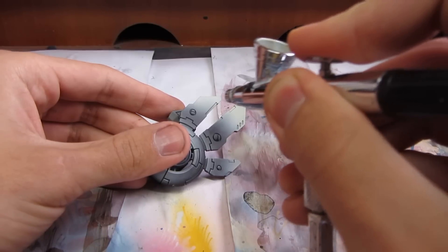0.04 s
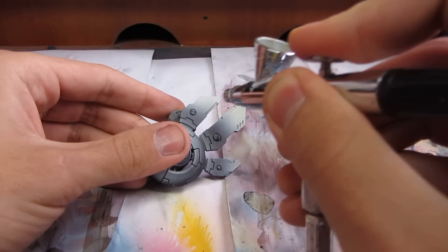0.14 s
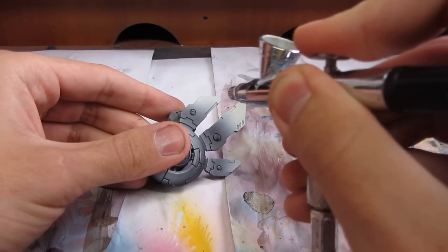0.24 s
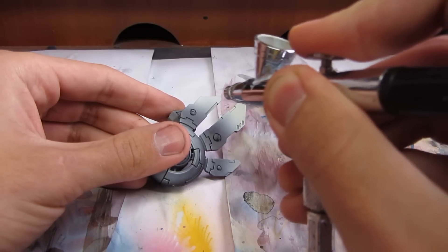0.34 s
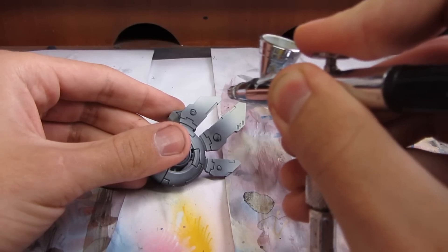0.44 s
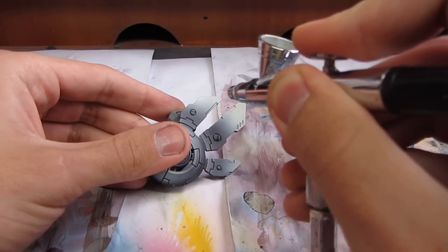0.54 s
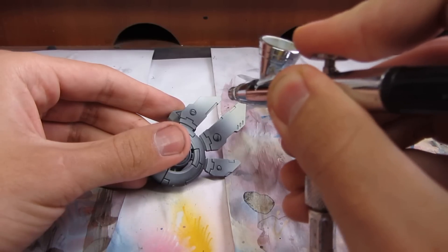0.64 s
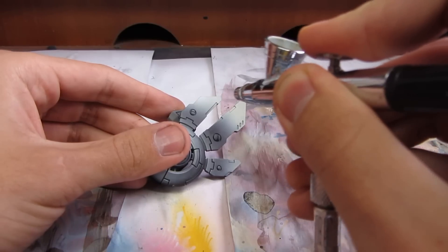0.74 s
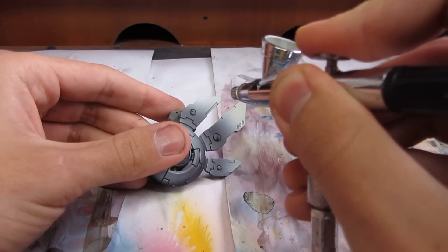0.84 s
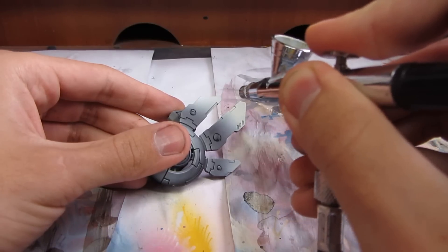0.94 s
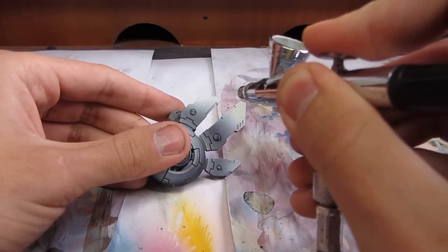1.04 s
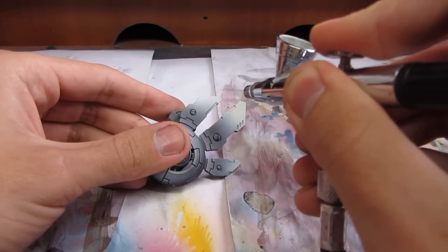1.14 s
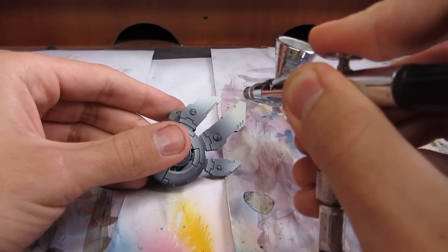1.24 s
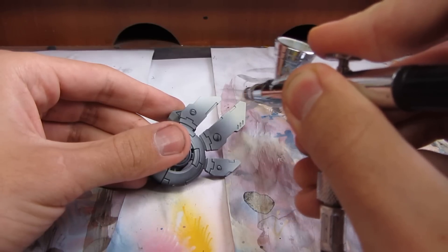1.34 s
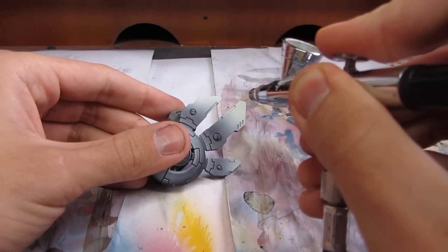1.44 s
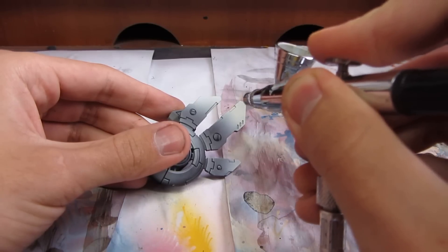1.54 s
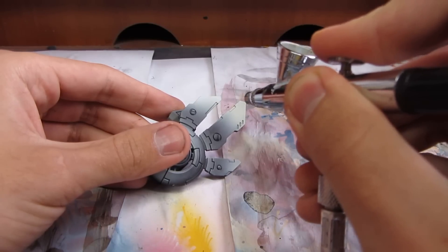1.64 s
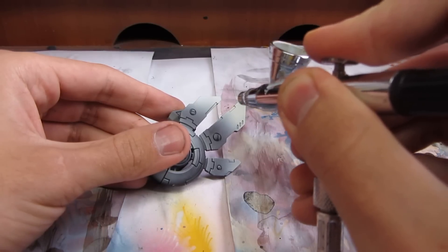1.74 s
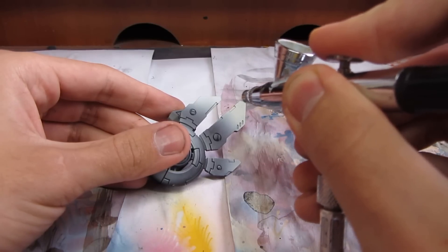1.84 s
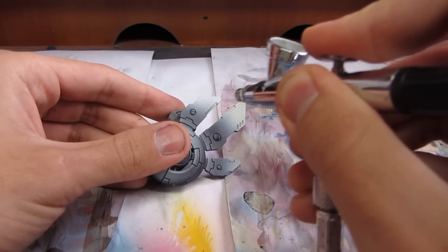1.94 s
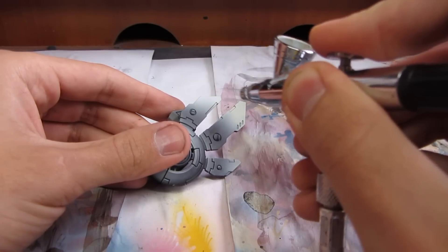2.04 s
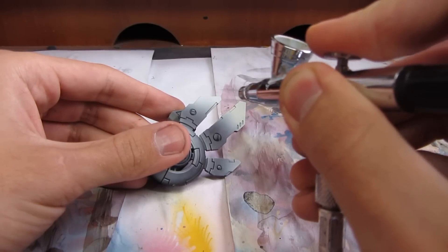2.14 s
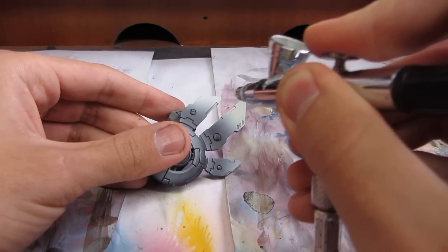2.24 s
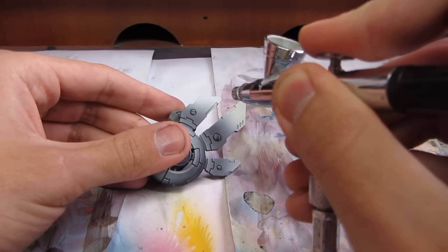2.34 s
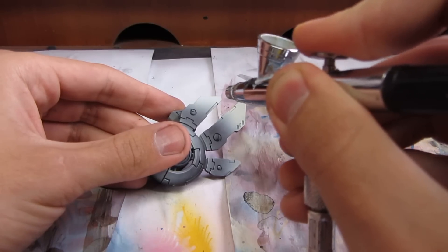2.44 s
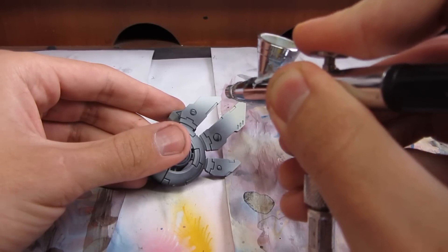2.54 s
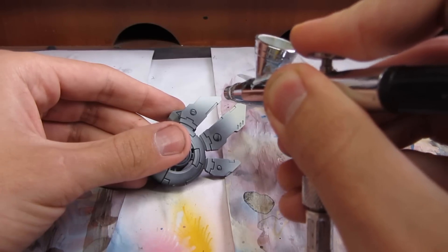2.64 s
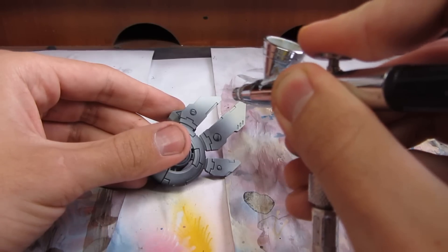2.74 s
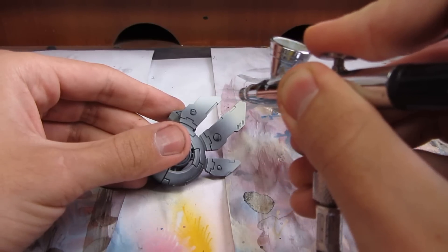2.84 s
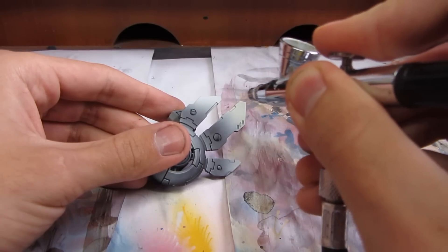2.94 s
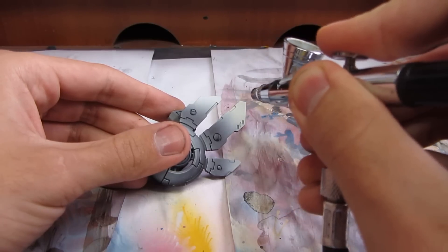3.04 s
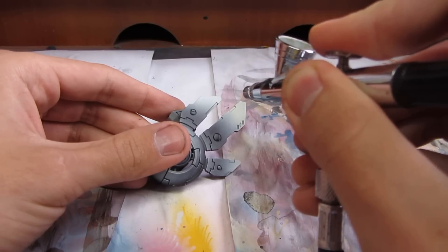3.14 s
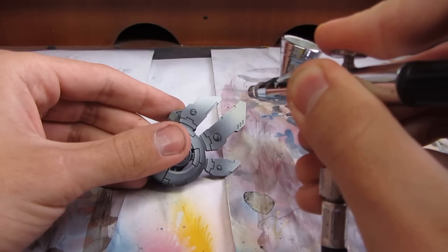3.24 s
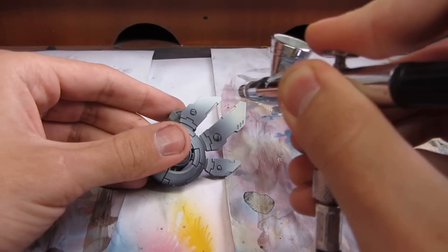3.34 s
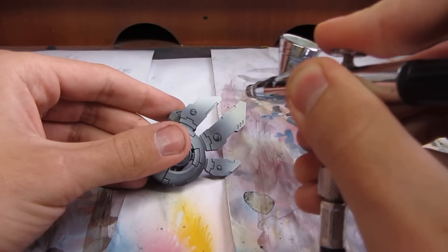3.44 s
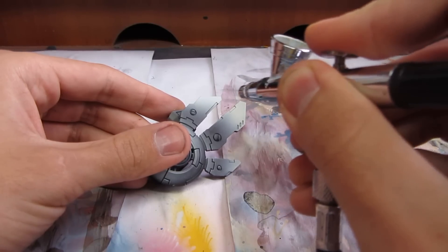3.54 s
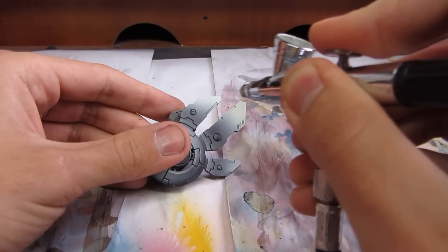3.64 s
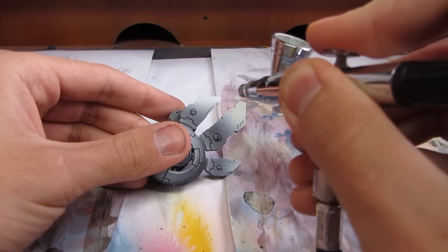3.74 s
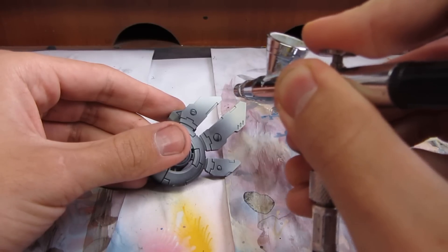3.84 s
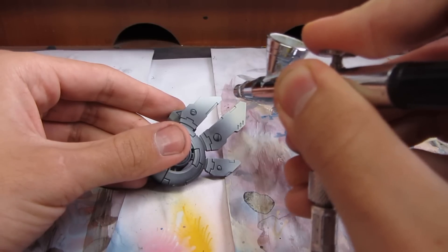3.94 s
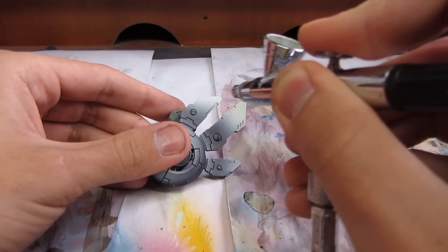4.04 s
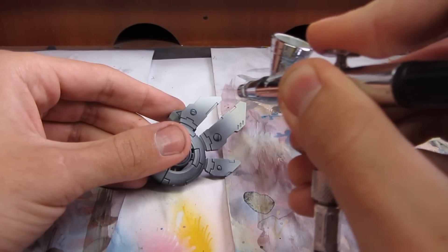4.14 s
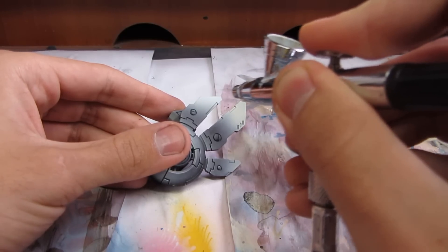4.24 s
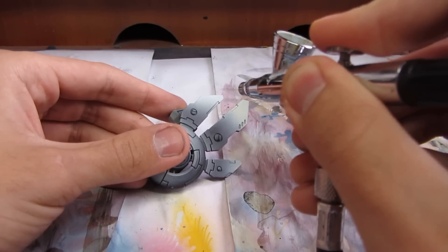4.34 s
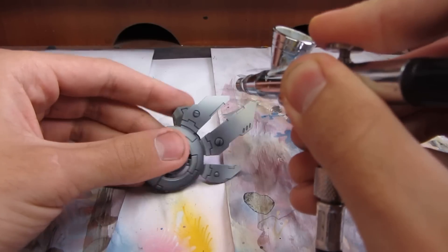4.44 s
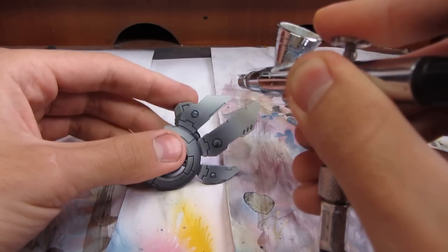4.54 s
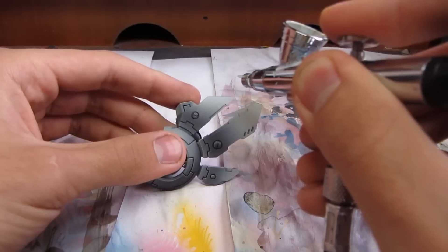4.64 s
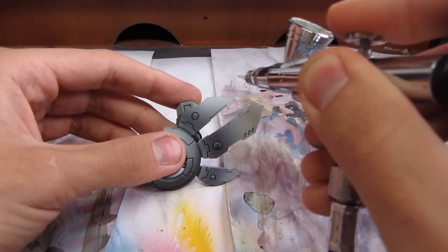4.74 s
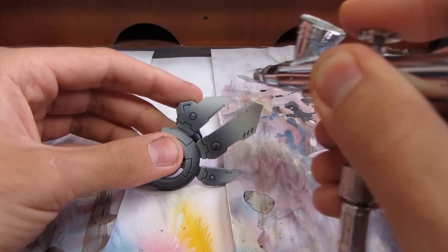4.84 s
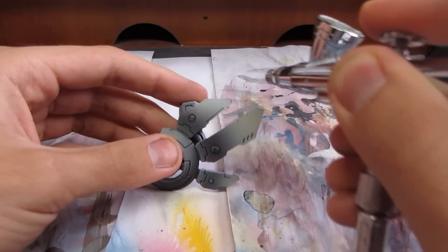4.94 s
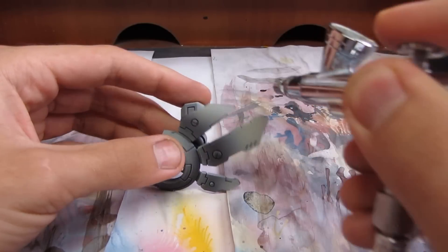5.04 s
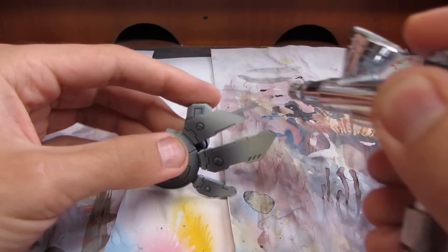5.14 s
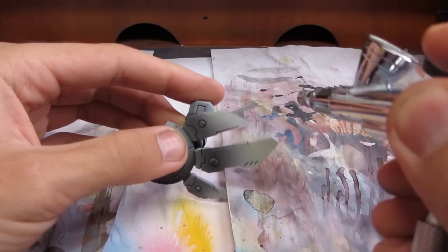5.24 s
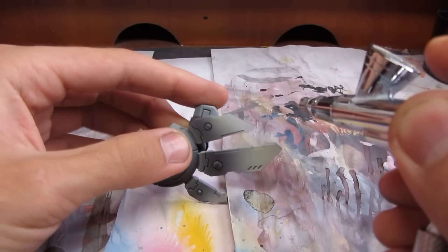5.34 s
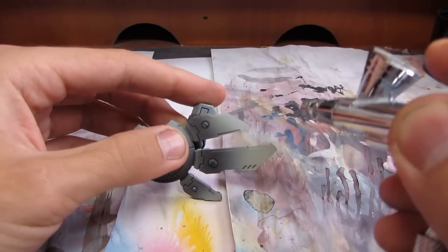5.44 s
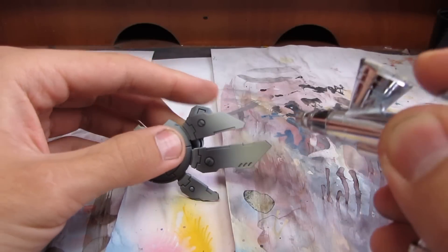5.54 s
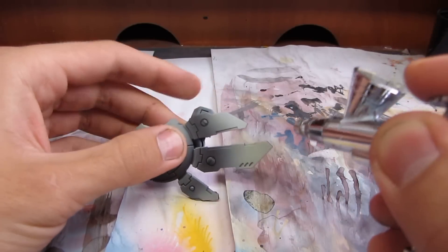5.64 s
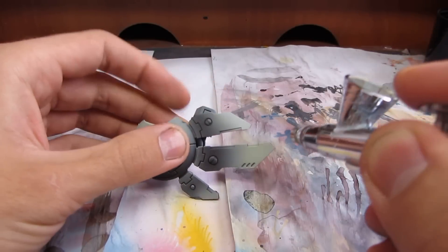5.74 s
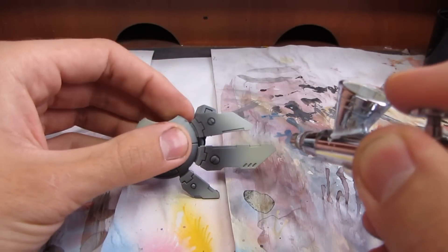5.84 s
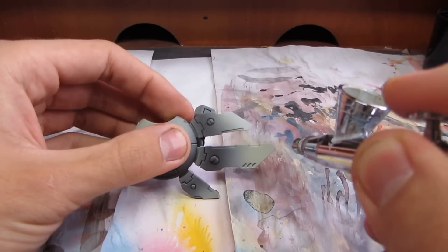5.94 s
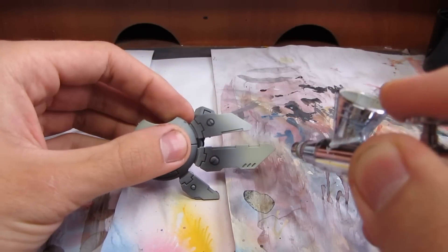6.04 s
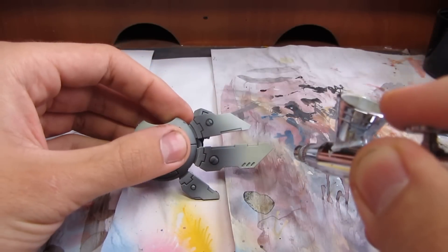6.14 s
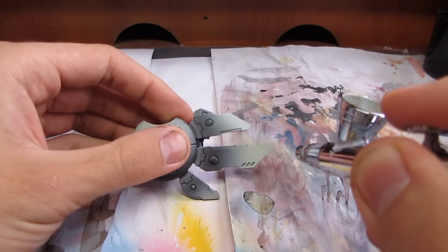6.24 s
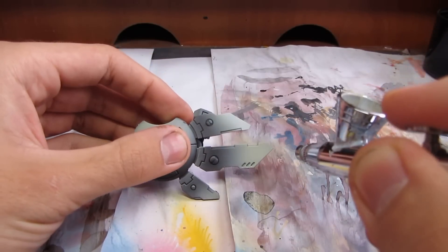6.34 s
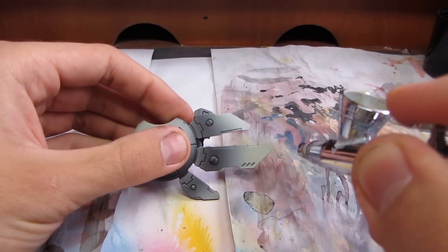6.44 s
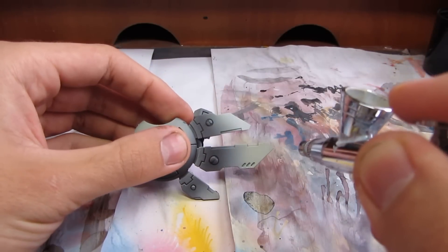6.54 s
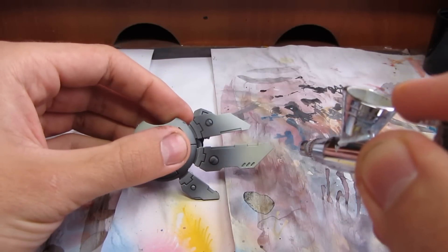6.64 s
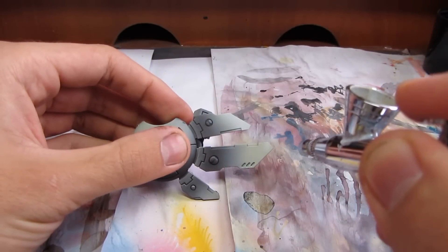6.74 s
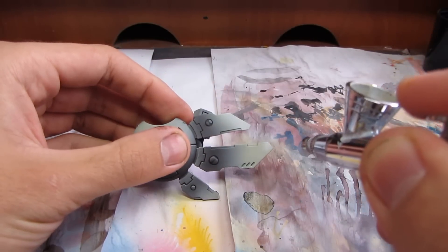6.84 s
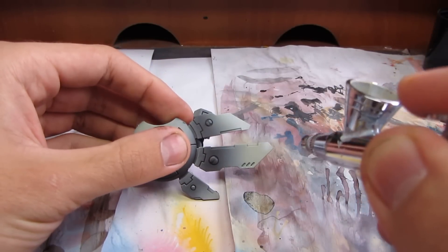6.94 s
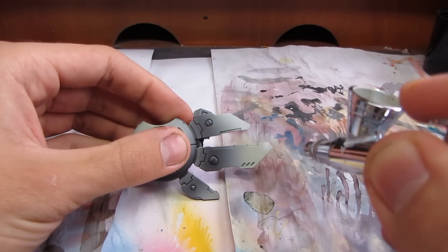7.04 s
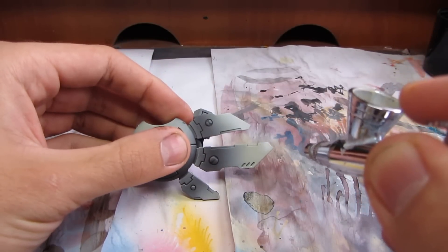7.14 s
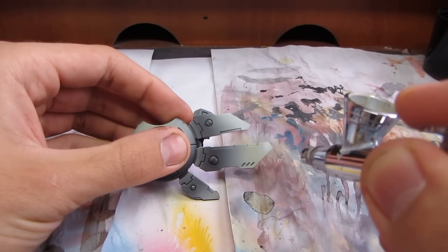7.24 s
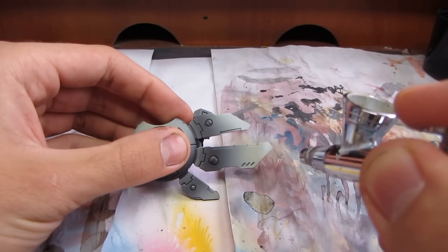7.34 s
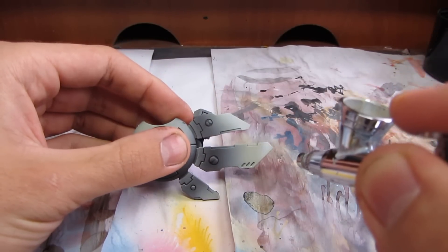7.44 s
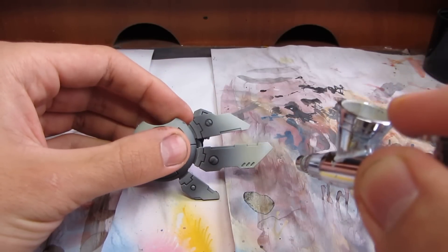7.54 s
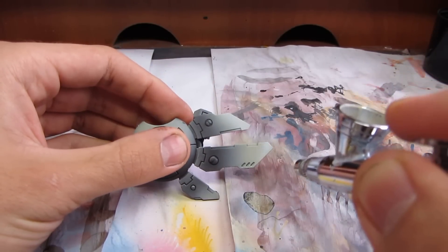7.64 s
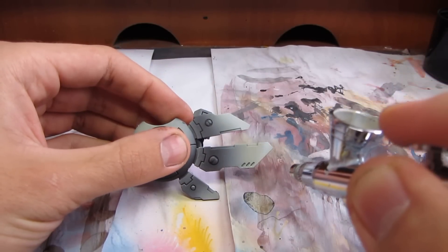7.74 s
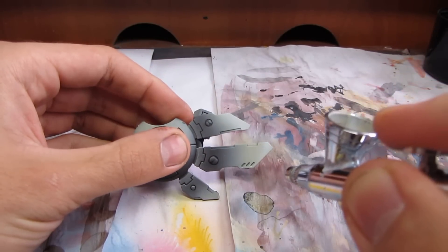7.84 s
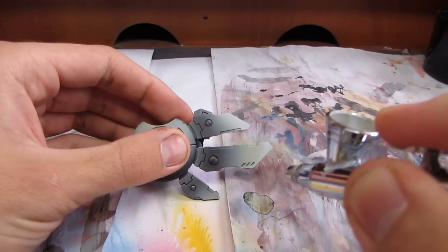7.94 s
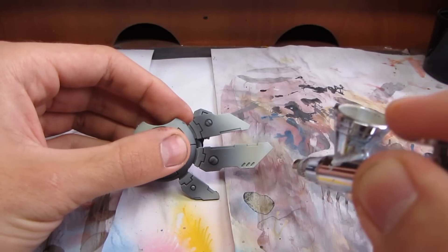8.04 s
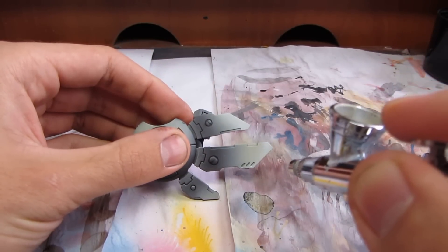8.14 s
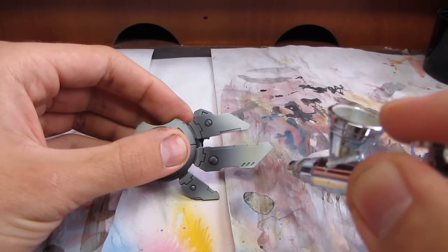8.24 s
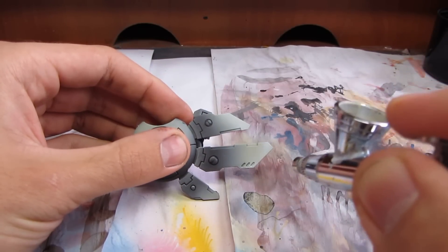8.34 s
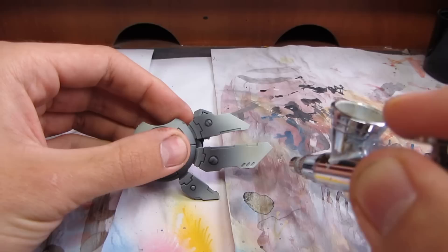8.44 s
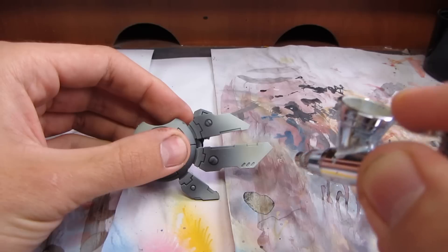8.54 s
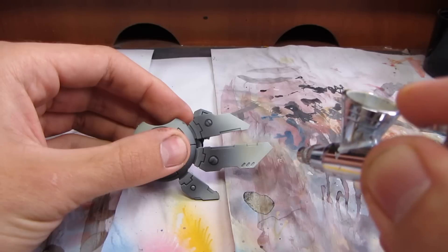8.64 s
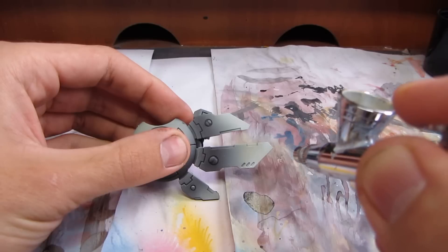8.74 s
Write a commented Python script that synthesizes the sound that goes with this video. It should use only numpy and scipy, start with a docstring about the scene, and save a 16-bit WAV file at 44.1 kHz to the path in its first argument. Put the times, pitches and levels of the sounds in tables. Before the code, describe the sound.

An airbrush is already spraying a small plastic part, a steady, close hiss that dips and swells as the hand moves. The workbench takes one soft knock just after the start. The air cuts off, and fingers turn the part with faint scuffs. A second burst follows with a slightly different tone, half whistling at first and ending with a faint low flutter. A low hum lies underneath in the small room, heard in stereo.

```python
"""An airbrush hisses close to a stereo microphone, spraying a small plastic part over a papered workbench.
The jet comes in two long bursts, coloured by the hollow between hands, part and bench.
A low room hum lies underneath, and the bench takes one soft knock just after the start.
In the pause the fingers turn the part with faint scuffs. In the second burst the jet half whistles
across the tip of the part, then buffets its edge."""
import sys
import numpy as np
from scipy import signal
from scipy.fft import rfft, irfft, next_fast_len
from scipy.io import wavfile
from scipy.ndimage import uniform_filter1d, map_coordinates

SR = 44100
rng = np.random.default_rng(int(sys.argv[2]) if len(sys.argv) > 2 else 0)


def dump(signal):
    """Clip the signal to [-1, 1] and save it as 16-bit WAV at the path in sys.argv[1]."""
    limited = np.clip(np.atleast_2d(signal).T, -1, 1)
    pcm = np.round(limited * 32767).astype(np.int16)
    wavfile.write(sys.argv[1], SR, pcm)


N = 387638
T = np.arange(N) / SR
PADDED = next_fast_len(N)
F = np.maximum(np.arange(PADDED // 2 + 1) * SR / PADDED, 1)


def undb(db):
    """Decibels to gain."""
    return 10 ** (np.asarray(db) / 20)


def unit(x):
    """Scale to rms 1."""
    return x / np.sqrt(np.mean(x ** 2))


def over_hz(points):
    """Join (Hz, value) points on a log-frequency axis."""
    hz, value = np.transpose(points)
    return np.interp(np.log(F), np.log(hz), value)


def over_time(rows):
    """Join (seconds, value, ..) rows into one curve per column."""
    seconds, *columns = np.transpose(rows)
    return [np.interp(T, seconds, column) for column in columns]


def shape(x, gain):
    """Filter by a gain per frequency."""
    return irfft(rfft(x, PADDED) * gain, PADDED)[..., :N]


def below(hz, order=12):
    """Gain of a low-pass."""
    return 1 / (1 + (F / hz) ** order)


def walk(rate):
    """Random levels held 1 / rate seconds and slewed twice; spread near 1."""
    hold = int(SR / rate)
    steps = np.repeat(rng.standard_normal(N // hold + 1), hold)
    return 1.64 * uniform_filter1d(uniform_filter1d(steps, hold), hold)[:N]


def mic_noise(coherence, lag_us=0):
    """Turbulence at the two microphone ports: a shared part, lagged on the right, and one of their own."""
    share = np.clip(over_hz(coherence), 0, 1)
    delay = np.exp(-2j * np.pi * F * np.array([[0], [lag_us]]) / 1e6)
    shared = shape(rng.standard_normal(N), np.sqrt(share) * delay)
    return shared + shape(rng.standard_normal((2, N)), np.sqrt(1 - share))


def echoes(x, t60):
    """A cloud of reflections that dies away, as strong as x and unrelated left and right."""
    age = T[:SR // 2]
    tail = rng.standard_normal((2, len(age))) * np.exp(-np.log(1000) * age / t60)
    tail /= np.sqrt(np.sum(tail ** 2, axis=1, keepdims=True))
    return signal.fftconvolve(x, tail, axes=1)[:, :N]


def reverb(x, wet_db=-16.5, t60=0.49, damp_hz=11000):
    """The small room returns a short, faint, duller tail to the microphone."""
    return undb(wet_db) * shape(echoes(x, t60), below(damp_hz, order=2))


def in_hollow(air, resonances, depth=1.08, ripple_db=-18):
    """Hands and bench colour the jet; short reflections off the moving fingers ripple that colour."""
    colour_db = 0
    for hz, width, left_db, right_db in resonances:
        bell = np.exp(-(2 * (F - hz) / width) ** 2)
        colour_db = colour_db + np.array([[left_db], [right_db]]) * bell
    air = shape(air, undb(depth * colour_db))
    short_waves = air - shape(air, below(1800))  # fingers are too small to reflect long ones
    ripple = echoes(short_waves, t60=.012) * walk(1.2)
    return air + undb(ripple_db) * ripple


# Quick swerves of the hand. Each row: middle in seconds, length in seconds, change of the hiss in dB.
SWERVES = [(.07, .1, 2.5), (0.144, .11, -1.5), (1.39, .09, 1.5), (1.505, 0.22, -5.5), (2.675, .09, -2.2),
           (2.833, 0.15, 2.5), (3.099, 0.32, -6.5), (3.332, 0.12, -4), (3.426, .12, 1.2), (3.52, .08, -1.5),
           (3.59, .1, 2.4), (4.09, .12, 1.2), (6.608, 0.084, 1.6), (7.023, .09, -2), (7.095, .11, 1.4)]


def swerve_db():
    """The jet slips off the part (quieter) or meets it squarely (louder), and returns in a smooth arc."""
    return sum(db * np.cos(np.pi * np.clip((T - middle) / length, -.5, .5)) ** 2
               for middle, length, db in SWERVES)


def jet(air, valve, trigger, rush_levels, flutter_db=0.23, sputter_db=0.37, nozzle_db=-0.8):
    """Big eddies on the part rush, middling ones hiss, fine ones sizzle and sputter with the paint."""
    low, high, top = below(1000), 1 - below(4500), 1 - below(11000, order=24)
    rush_follows, sizzle_follows, nozzle_follows = 0.63, 1.07, 0.4  # dB per dB
    level_db, sizzle_db = over_time(trigger)
    aim_db = swerve_db()
    rush = unit(shape(air, low)) * undb(over_time(rush_levels)[0] + rush_follows * aim_db)
    hiss_share = np.clip(1 - undb(sizzle_db) ** 2, .1, 1)
    hiss = unit(shape(air, 1 - low - high)) * undb(level_db + aim_db) * np.sqrt(hiss_share)
    fine = shape(air, high - top)
    fine_db = level_db + sizzle_db + sizzle_follows * aim_db
    sizzle = unit(fine) * undb(fine_db + sputter_db * walk(120))
    # the highest hiss is born at the nozzle, so it fades less when the jet misses the part
    usual_db = np.median([level + offset for _, level, offset in trigger])
    top_db = usual_db + nozzle_db + nozzle_follows * (fine_db - usual_db)
    nozzle = shape(air, top) / np.std(fine) * undb(top_db)
    opens, closes, rise, fall = valve
    gate = np.clip((T - opens) / rise, 0, 1) * np.clip(1 - (T - closes) / fall, 0, 1)
    return (rush + hiss + sizzle + nozzle) * undb(flutter_db * walk(30)) * gate ** 2


# The air valve, one row a burst. Each row: opening, closing, rise and fall, all in seconds.
VALVE = [(-0.1, 4.624, .01, 0.036), (6.209, 9.0, 0.011, .02)]


def spray(burst, near, plain, trigger, rush_levels):
    """The close microphone hears the jet through the hollow; the room returns it plain."""
    direct = jet(near, VALVE[burst], trigger, rush_levels)
    return direct + reverb(jet(plain, VALVE[burst], trigger, rush_levels))


# Likeness of left and right at the microphone. Each row: frequency in Hz, coherence from 0 to 1.
FIRST_COHERENCE = [(200, 0.88), (1400, 0.99), (2300, 0.89), (3300, 0.81), (7000, 0.84), (10500, 0.87),
                   (12500, 0.87), (15000, 0.45)]
# Broad spectrum of the jet. Each row: frequency in Hz, relative level in dB.
FIRST_SPECTRUM = [(100, -32.5), (300, -21.5), (600, -12), (1500, -5.5), (3000, 0.3), (4300, -11.5),
                  (7000, -8.5), (10000, -8), (12000, -19.5), (14500, -14.5), (15700, -15.5)]
# Peaks and notches from hands and bench.
# Each row: centre in Hz, width in Hz, left and right gain in dB before scaling by depth.
FIRST_HOLLOW = [(1107, 223, -9, -3.5), (1444, 520, 4, 4), (1943, 280, -5, -3.5), (2317, 200, 2.5, 6),
                (2910, 530, -3.5, -0.6), (3610, 360, 5.5, 2), (4200, 150, 1.5, -0.5), (4660, 650, 6.5, 5.5),
                (4960, 600, -7.5, -3.5), (5425, 200, 6.5, 0), (5870, 350, -5.5, -7), (6280, 810, 3.5, 3.5),
                (8300, 300, 2, 4), (9400, 1140, 1, -2.5), (10950, 520, 3.5, 0.5), (12520, 350, -13, 4),
                (13270, 510, 2, 0.5), (15380, 350, -4, -6)]
# Slow course of the trigger and the distance to the part.
# Each row: time in seconds, relative level in dB, sizzle in dB against that level.
FIRST_TRIGGER = [(0.02, -18.5, -4), (1.0, -18, -4), (1.8, -17.2, -3), (2.55, -17.5, -5), (3.2, -18.5, -3.6),
                 (4.32, -17, -4), (4.48, -19, -3), (4.62, -24.5, -3.5)]
# Low rush of air striking the part. Each row: time in seconds, relative level in dB.
FIRST_RUSH = [(0.02, -34.5), (0.5, -33.5), (1.05, -39), (2.2, -35), (2.7, -31.5), (3.05, -40), (4.15, -36),
              (4.62, -36.1)]


def first_burst():
    """Already blowing close to the microphone, the airbrush plays on the part and at last draws back."""
    air = shape(mic_noise(FIRST_COHERENCE, lag_us=6.8), undb(over_hz(FIRST_SPECTRUM)))
    near = draw_back(in_hollow(air, FIRST_HOLLOW))
    return spray(0, near, air, FIRST_TRIGGER, FIRST_RUSH)


# Likeness of the room's noise left and right. Each row: frequency in Hz, coherence from 0 to 1.
ROOM_COHERENCE = [(60, .45), (300, 0.42), (1000, 0.39), (8000, 0.25)]
# The rumble around the bench. Each row: frequency in Hz, relative density in dB.
ROOM_SPECTRUM = [(18, -43), (35, -15), (60, -11), (110, -5), (280, -7), (600, -12.5), (1200, -18),
                 (2500, -27.5), (4000, -33.5), (8500, -39.5), (12000, -56), (15500, -59.5)]
# The hum. Each row: frequency in Hz, level in dB against the rumble.
HUM = [(119, -18.5), (356, -26)]
# Rumble and hum come up in the pause, a set curve for the recorder's automatic gain recovering.
# Each row: time in seconds, level in dB.
BACKGROUND_LEVEL = [(0, -47), (4.6, -44.5), (4.85, -47), (5.1, -45), (6.2, -41.5), (6.3, -46.5),
                    (8.79, -47.5)]


def room_noise(waver_db=0.5):
    """A dull rumble all round the microphone, with a faint, wavering hum."""
    rumble = unit(shape(mic_noise(ROOM_COHERENCE), undb(over_hz(ROOM_SPECTRUM))))
    hum = 0
    for hz, db in HUM:
        peak = np.sqrt(2) * undb(db + 2 * walk(6))
        hum = hum + peak * np.sin(2 * np.pi * hz * T + .5 * walk(6.3))
    return (rumble + hum) * undb(over_time(BACKGROUND_LEVEL)[0] + waver_db * walk(6.9))


# A soft knock on the bench. One row: start in seconds, pitch in Hz, seconds to fall 60 dB.
KNOCK = (.186, 168, .42)


def knock(level_db=-31):
    """A padded bump rings one low mode of the bench."""
    start, hz, t60 = KNOCK
    age = np.maximum(T - start, 0)
    push = np.minimum(age * hz / 2, 1)  # the soft contact lasts two cycles
    return undb(level_db) * push * np.exp(-np.log(1000) * age / t60) * np.sin(2 * np.pi * hz * age)


# The airbrush draws back. One row: start in seconds, length in seconds, share of pitch lost per second.
DRAW_BACK = (4.35, .27, .26)


def draw_back(air):
    """The gap to the part widens, so its treble resonances slide down a little."""
    start, length, sink_per_s = DRAW_BACK
    treble = below(9000, order=100) - below(3950, order=100)
    pitch_ratio = 1 - sink_per_s * np.clip(T - start, 0, length)
    position = np.cumsum(pitch_ratio) - 1
    slid = np.array([map_coordinates(side, [position], order=5, mode="mirror") for side in air])
    return air + shape(slid - air, treble)


# Fingers turn the part near the microphone.
# Each row: start in seconds, length in seconds, level in dB, centre in Hz.
SCUFFS = [(4.88, 0.1, -63, 8000), (5.003, 0.053, -54, 7000), (5.057, 0.13, -60, 9000),
          (5.175, 0.08, -52.5, 6470), (5.238, .04, -55, 6500), (5.45, 0.049, -57, 8000),
          (5.495, 0.14, -52, 7000), (5.584, .1, -56, 8500), (5.915, .04, -58.5, 6000)]


def scuffs(grain_db=2.2, spread=0.93):
    """Skin slips on plastic: grainy bright noise that rises fast and dies away."""
    out = 0
    for start, length, db, hz in SCUFFS:
        progress = np.clip((T - start) / length, 0, 1)
        band = np.exp(-np.log(F / hz) ** 2 / (2 * spread ** 2)) * below(10700, order=4)
        slip = unit(shape(mic_noise([(1000, .7), (12000, .5)], lag_us=40), band))
        out = out + slip * undb(db) * np.sin(np.pi * progress ** 0.66)
    return out * undb(grain_db * walk(400))


# Likeness of left and right at the microphone. Each row: frequency in Hz, coherence from 0 to 1.
SECOND_COHERENCE = [(200, 0.9), (1400, 1), (2200, 0.8), (4000, 0.88), (7000, 0.62), (15000, 0.18)]
# Broad spectrum of the jet. Each row: frequency in Hz, relative level in dB.
SECOND_SPECTRUM = [(100, -27.5), (300, -16.5), (600, -7.5), (1500, -0.5), (3000, 1), (4300, -6),
                   (7000, -5.5), (10000, -11.5), (12000, -15.5), (14500, -15), (15700, -17)]
# Peaks and notches with the part turned.
# Each row: centre in Hz, width in Hz, left and right gain in dB before scaling by depth.
SECOND_HOLLOW = [(1064, 246, -12, -5.5), (1270, 440, 5.5, 6.5), (1695, 160, -13, -7), (2180, 810, -1, 4.5),
                 (2710, 450, 2, -4), (3000, 220, 3, 3), (3880, 300, -2, 3), (4970, 290, 3.5, 4.5),
                 (5320, 480, -3.5, -8), (5570, 440, 4, 3), (5950, 430, -3.5, -7.5), (6490, 91, 1, 8),
                 (6880, 380, 1.5, -6.5), (8320, 740, 2, 0.5), (8970, 240, 0, 3.5), (13680, 1410, 2.6, 4.0)]
# Trigger and distance. Each row: time in seconds, relative level in dB, sizzle in dB against that level.
SECOND_TRIGGER = [(6.24, -16.5, -4), (6.58, -17, -6), (6.8, -20, -6), (7.2, -19.5, -5.5),
                  (7.55, -16.5, -3.5), (7.92, -18, -4.5), (8.35, -17, -5.2), (8.78, -18, -5.5)]
# Low rush on the part. Each row: time in seconds, relative level in dB.
SECOND_RUSH = [(6.24, -32.5), (6.9, -36.5), (7.5, -33.5), (7.85, -38), (8.3, -33.1), (8.78, -29.5)]


def second_burst():
    """The valve opens again on the turned part, and the hollow gives the jet a new colour."""
    air = shape(mic_noise(SECOND_COHERENCE, lag_us=-12.5), undb(over_hz(SECOND_SPECTRUM)))
    return spray(1, in_hollow(air, SECOND_HOLLOW), air, SECOND_TRIGGER, SECOND_RUSH)


# The jet half whistles across the tip of the part. Each row: time in seconds, level in dB.
WHISTLE = [(6.22, -100), (6.3, -44), (6.55, -31), (6.9, -34), (7.2, -37), (7.45, -46), (7.7, -100)]
# The jet buffets the edge of the part. Each row: time in seconds, level in dB.
BUFFET = [(7.9, -82), (8.2, -57), (8.5, -45), (8.79, -41)]


def edge_noise(levels, hz, octaves):
    """The jet breaks on an edge and sheds noise: high and narrow it whistles, low and wide it buffets."""
    band = np.exp(-(np.log2(F / hz) / octaves) ** 2 / 2)
    return unit(shape(mic_noise([(100, .8), (400, .9)]), band)) * undb(over_time(levels)[0])


def scene():
    """Two bursts and the handling between them, heard from close by the bench in a small room."""
    bursts = undb(0.5) * first_burst() + undb(0.51) * second_burst()
    edges = edge_noise(BUFFET, hz=220, octaves=.7) + edge_noise(WHISTLE, hz=5030, octaves=.04)
    small_sounds = knock() + scuffs() + edges
    return bursts + small_sounds + reverb(small_sounds) + room_noise()


def record(dry, top_hz=15680):
    """The camera that carries the microphone cuts the top steeply."""
    return signal.sosfilt(signal.ellip(12, .1, 80, top_hz, fs=SR, output="sos"), dry)


dry = scene()
out = record(dry)
dump(out)
```